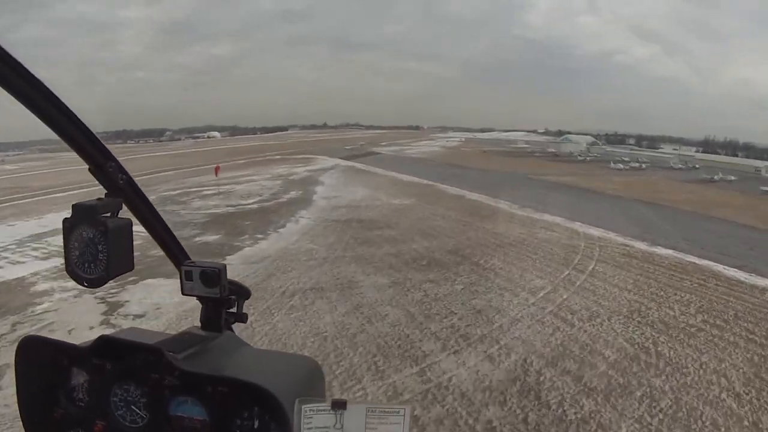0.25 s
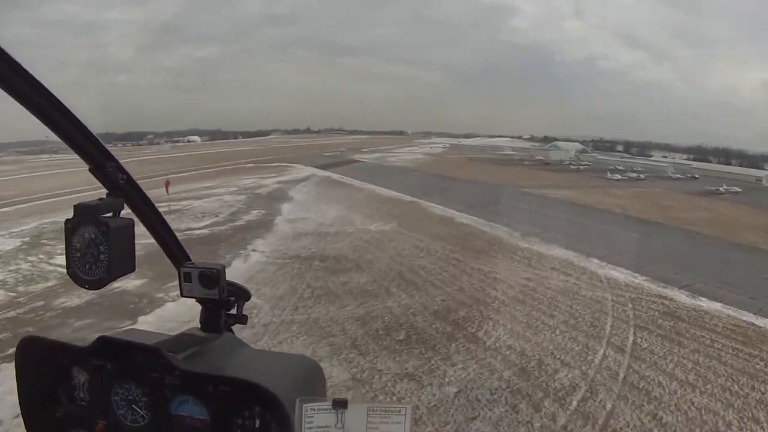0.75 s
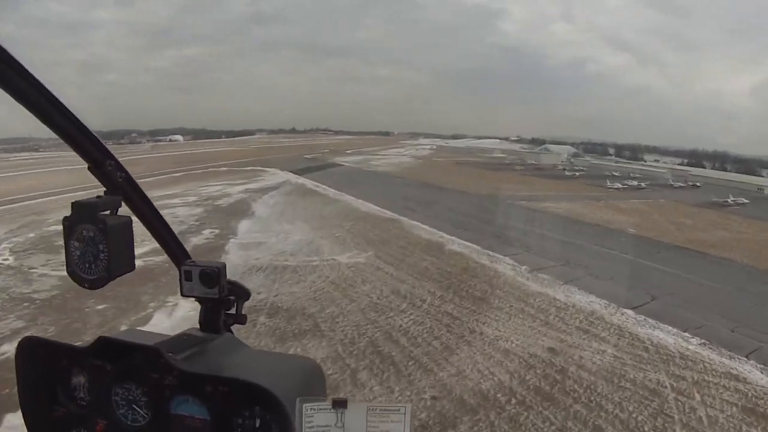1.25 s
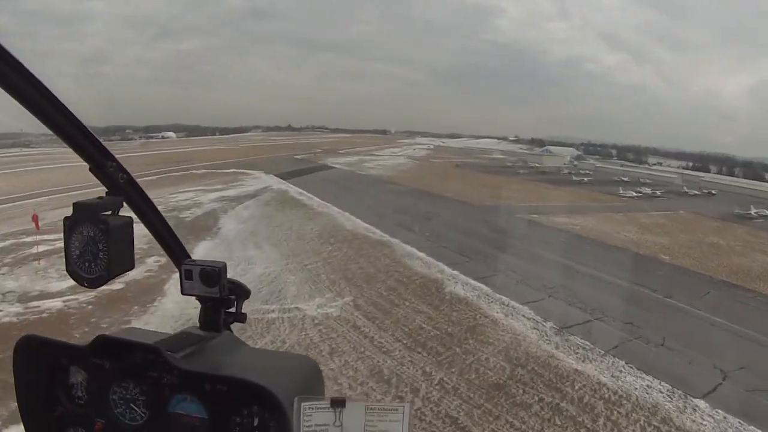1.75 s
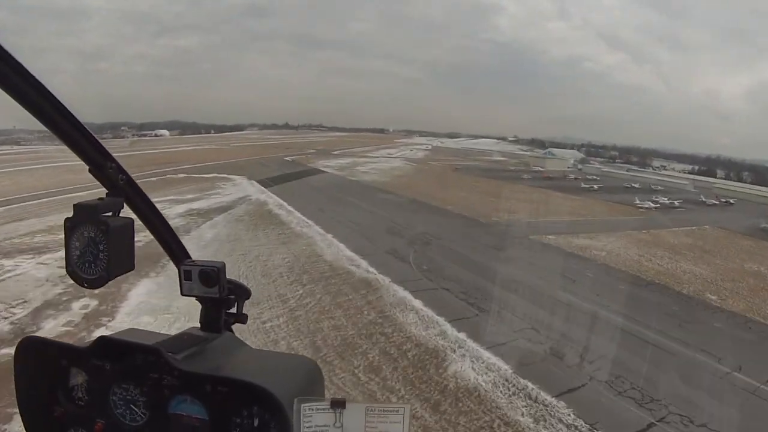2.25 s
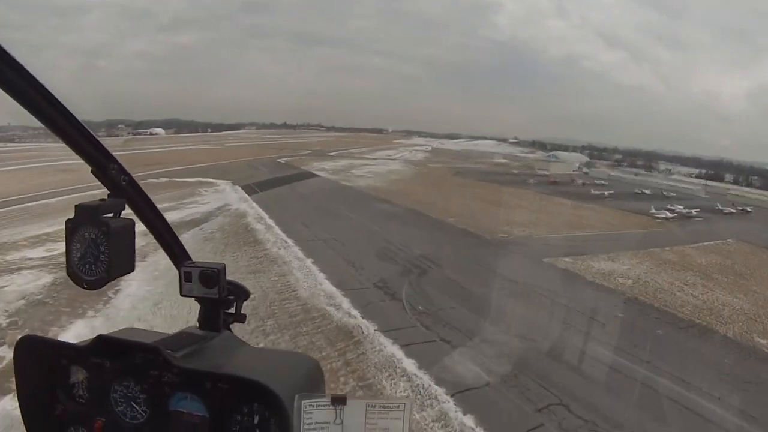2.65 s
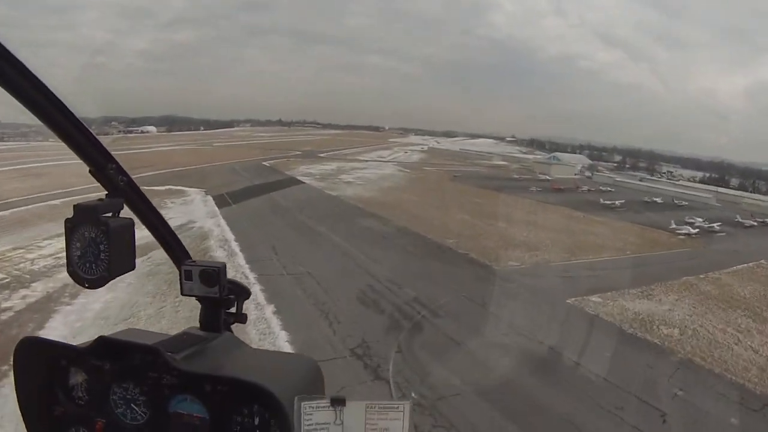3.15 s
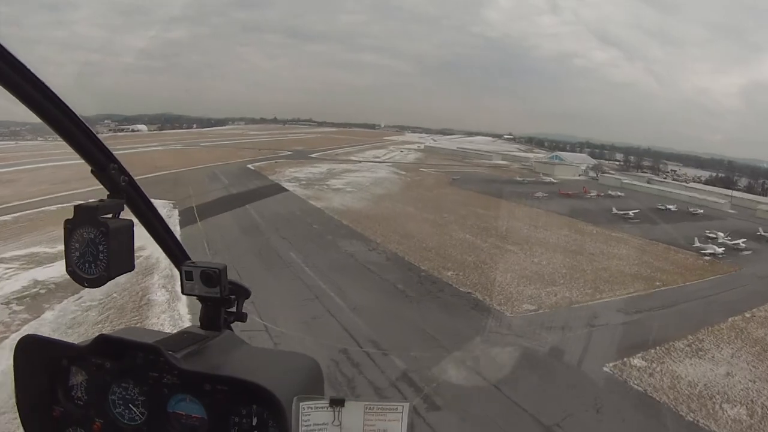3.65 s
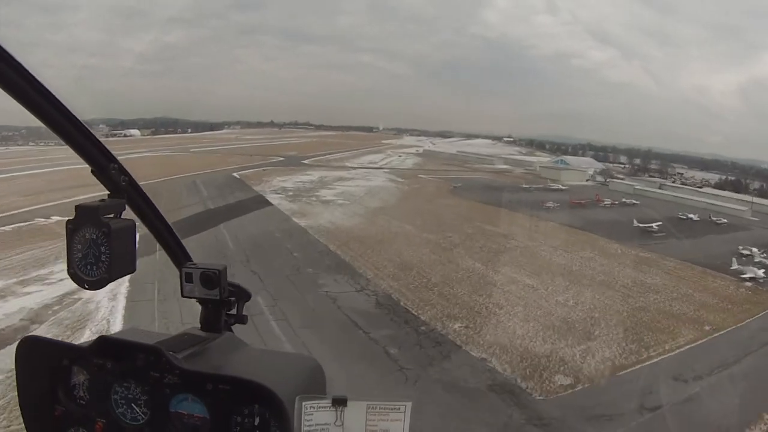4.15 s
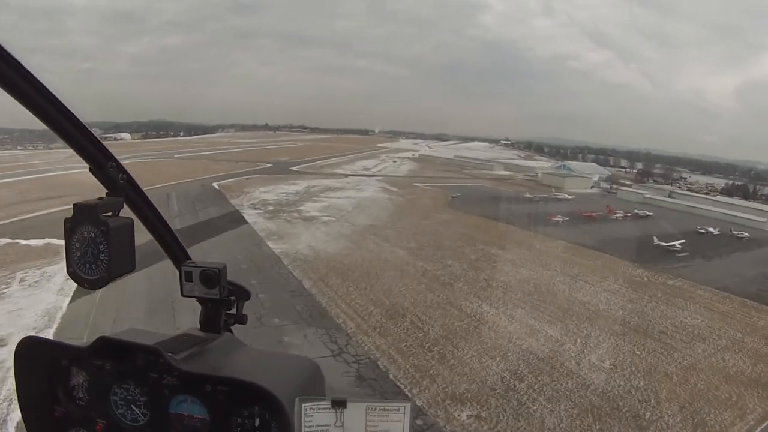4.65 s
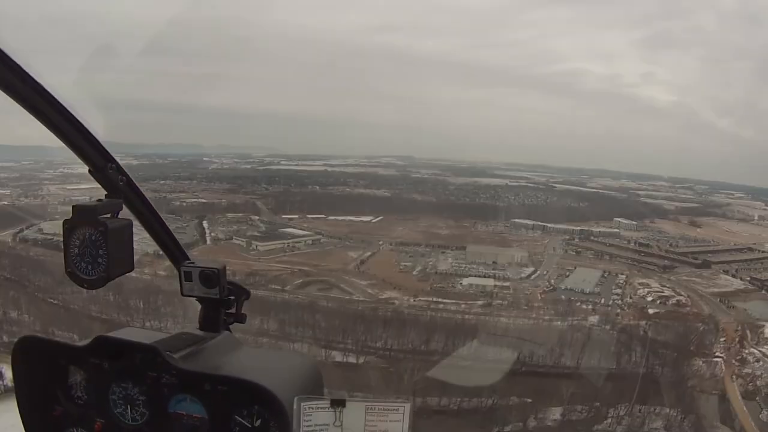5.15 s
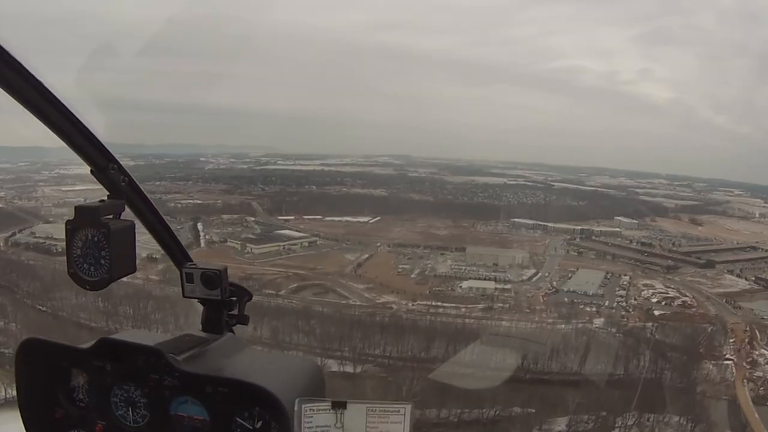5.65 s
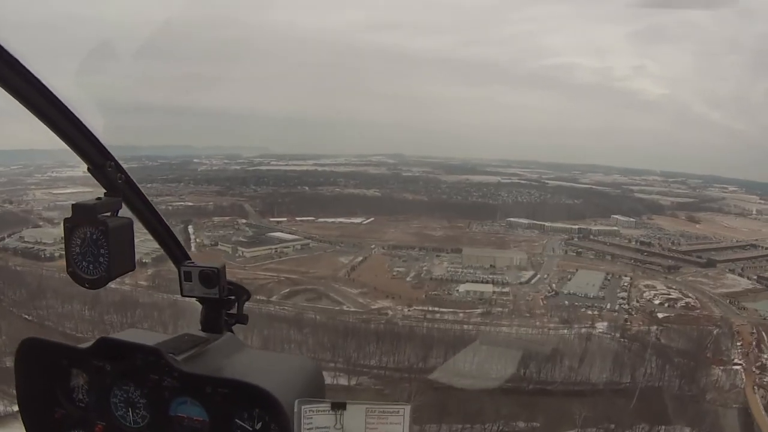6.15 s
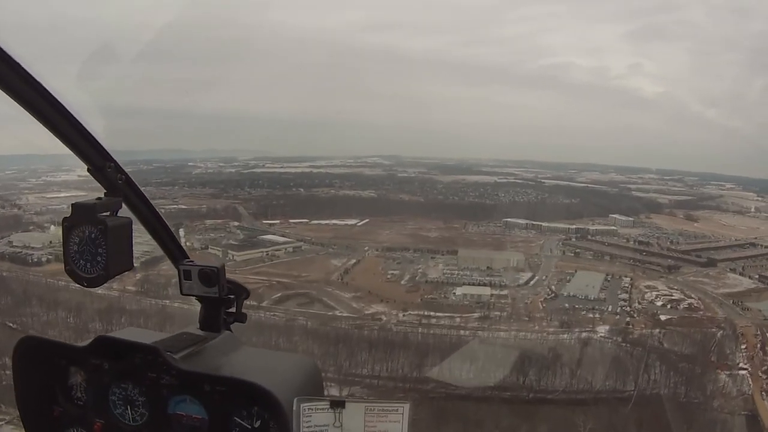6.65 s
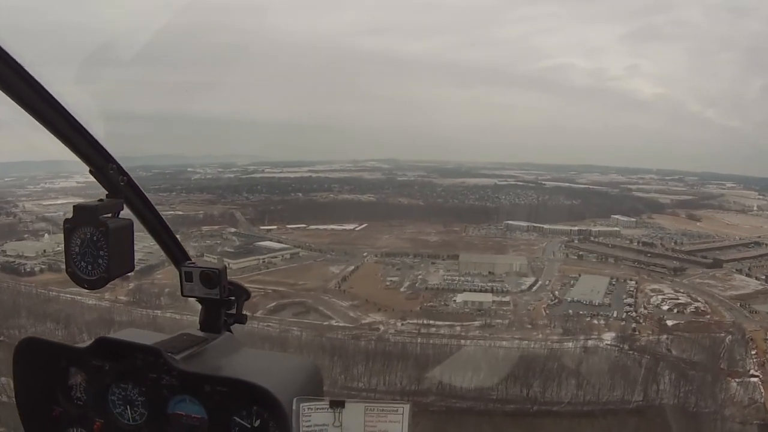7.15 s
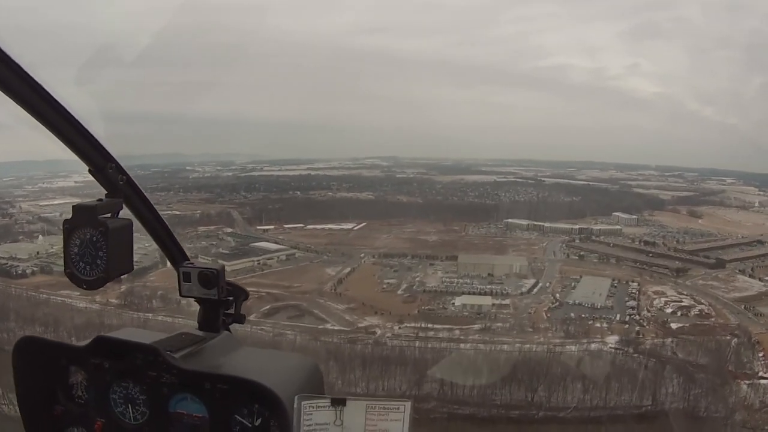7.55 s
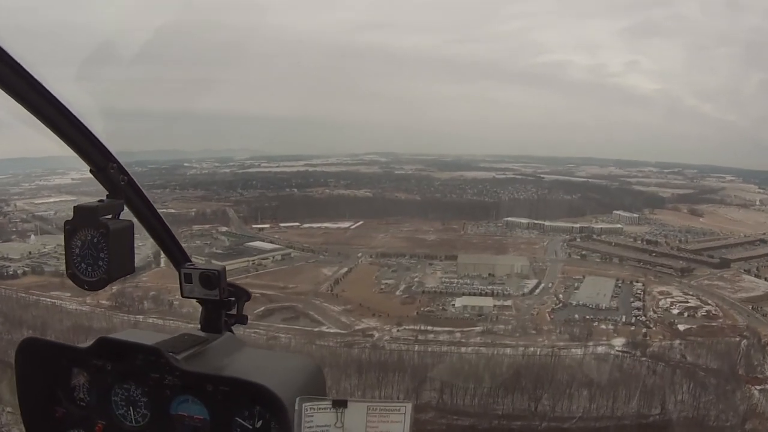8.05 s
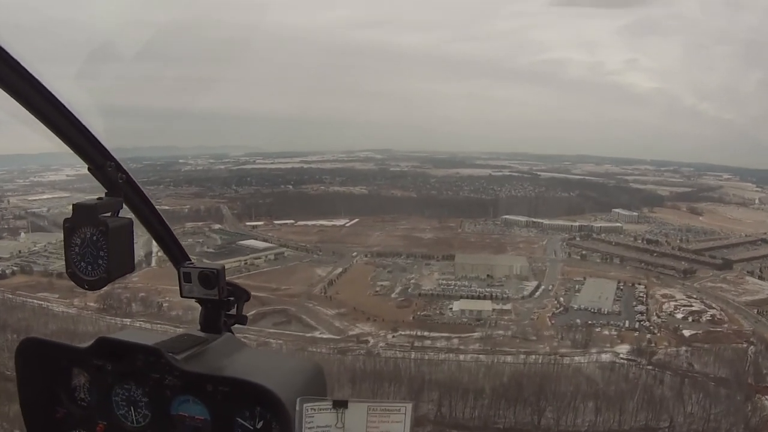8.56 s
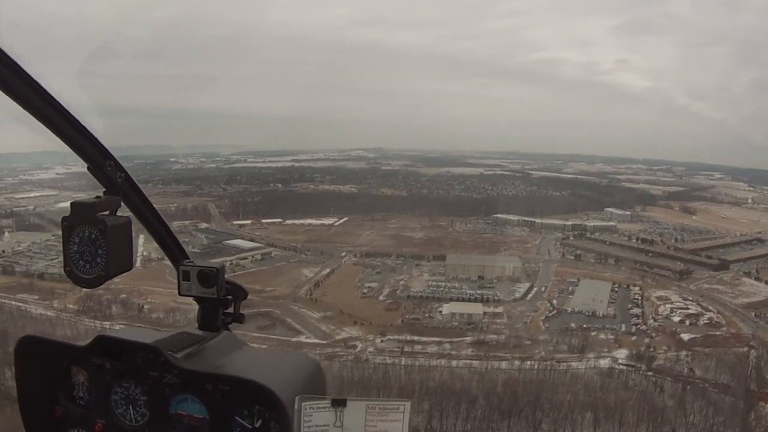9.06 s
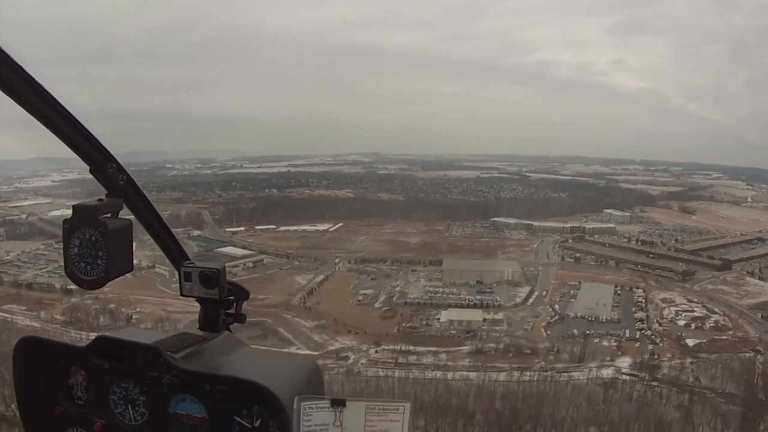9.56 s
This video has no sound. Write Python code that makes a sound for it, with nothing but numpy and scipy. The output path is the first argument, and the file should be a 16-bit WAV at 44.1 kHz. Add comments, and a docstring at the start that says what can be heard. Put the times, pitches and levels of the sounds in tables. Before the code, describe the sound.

Close cabin microphone in a light helicopter lifting off: heavy, bass-rich drone beating slowly as engine and rotor tones drift against each other, with about seventeen blade pulses a second. Dry, irregular rattling rides on top, along with muffled wind and tiny high squeaks. Halfway through, the sound clicks and jumps to climbing flight, continuing with deeper chopping and fuller panel thuds, never fading.

```python
"""Inside the cabin of a small piston helicopter: it lifts off, leaking-seal hiss growing over the first 1.4 s.
Engine harmonics throb against those of the two-blade rotor; tail rotor and gearbox add faint tones. Blade-
shaped noise makes boom, rush and hiss; struck modes make a rattle and panel thumps; chirps squeak. At 5.11 s
the scene changes to the climb with a click as the drone dips: new tone levels, deeper air chop."""
import sys
import numpy as np
from scipy import signal
from scipy.fft import rfft, irfft, next_fast_len
from scipy.io import wavfile
from scipy.ndimage import map_coordinates

SR = 44100
rng = np.random.default_rng(int(sys.argv[2]) if len(sys.argv) > 2 else 0)


def generate_wav(sig):
    """Save sig (samples, or channels by samples) to the path in sys.argv[1] as 16-bit PCM at SR."""
    pcm = np.round(np.clip(np.atleast_2d(sig).T, -1, 1) * 32767).astype(np.int16)
    wavfile.write(sys.argv[1], SR, pcm)


N = 431738
JUMP_S = 5.1113  # lift-off before, climb after


def amp(db):
    """Decibels to gain."""
    return 10 ** (np.asarray(db) / 20)


def unit(x):
    """Scales to rms 1."""
    return x / np.sqrt(np.mean(x ** 2) + 1e-20)


def curve(points):
    """Joins (s, value) points by straight lines."""
    return np.interp(np.arange(N) / SR, *np.transpose(points))


def noise(spectrum):
    """Noise of rms 1 with the given (Hz, dB) outline, interpolated over log frequency."""
    hz, db = np.transpose(spectrum)
    size = next_fast_len(N, True)
    bins_hz = np.fft.rfftfreq(size, 1 / SR)
    gain = amp(np.interp(np.log(bins_hz + 1), np.log(hz), db))
    return unit(irfft(rfft(rng.standard_normal(size)) * gain, size)[:N])


def wander(per_s):
    """Smooth random motion of rms 1, with per_s random knots a second."""
    knots = rng.standard_normal(4096)
    coarse = np.arange(0, N + 64, 64)
    motion = map_coordinates(knots, [coarse / SR * per_s], mode="wrap")
    return unit(np.interp(np.arange(N), coarse, motion))


def tones(turns, orders, climbing, smear_turns=None):
    """Complex whole harmonics of a shaft: phases lag by squared order if smeared, else scatter."""
    k, lift_db, climb_db = np.transpose(orders)
    if smear_turns is None:
        phases = rng.random(len(k))
    else:
        phases = smear_turns * (k - k[np.argmax(lift_db)]) ** 2
    angle = np.linspace(0, 1, 4097)  # one turn
    harmonics = np.sqrt(2) * np.exp(2j * np.pi * (np.outer(angle, np.round(k)) + phases))
    lift = np.interp(turns % 1, angle, harmonics @ amp(lift_db))
    climb = np.interp(turns % 1, angle, harmonics @ amp(climb_db))
    return np.where(climbing, climb, lift)


def swish(blades, depth, sharpness, lag):
    """A gain of rms 1 that swells once per blade, lag blade passes after it."""
    return unit(1 + depth * np.exp(sharpness * (np.cos(2 * np.pi * (blades - lag)) - 1)))


def pass_times(blades, place):
    """Times (s) at which the rotor reaches the given places in blade passes; -1 if outside the scene."""
    return np.interp(place, blades, np.arange(N) / SR, left=-1, right=-1)


def add(mix, s, sound):
    """Mixes a sound in at s seconds, if that is within the scene."""
    if s >= 0:
        part = mix[round(s * SR):][:len(sound)]
        part += sound[:len(part)]


# governed engine speed, almost steady: (time [s], speed [four-stroke cycles/s])
ENGINE_SPEED = [(0, 21.87), (0.9, 21.89), (2.6, 21.83), (4.3, 21.79), (5.11, 21.81), (5.9, 21.93),
                (6.7, 22.0), (7.5, 22.02), (8.2, 22.0), (9.0, 21.93)]


def engine_cycles():
    """Running count of four-stroke cycles: the integral of engine speed."""
    return np.cumsum(curve(ENGINE_SPEED)) / SR


# blade passes per engine cycle; the drive belts slip a little more at lift-off
GEARING_LIFT, GEARING_CLIMB = 0.7933, 0.7956
FIRST_PASS = 0.305  # blade passes still to go at the start


def blade_passes(cycles, climbing):
    """Rotor position geared to the engine; a blade passes at each whole number."""
    return np.where(climbing, GEARING_CLIMB, GEARING_LIFT) * cycles - FIRST_PASS


# engine harmonics: (multiple of engine cycle, sounded at nearest whole [1],
#   lift-off level re ENGINE_LEVEL [dB], climb level re ENGINE_LEVEL [dB])
ENGINE_ORDERS = [(1.01, -6.5, -10), (2.04, -10.5, -10), (3.005, 1, -0.3), (3.986, -6.5, -4),
                 (5, -13.5, -23.5), (5.998, -14.5, -19.5), (6.972, -22, -24.5), (7.987, -28, -25.5),
                 (8.98, -34, -33), (9.994, -30.5, -33), (11, -36, -37), (12, -21.5, -31), (13, -23.5, -30),
                 (13.92, -20.5, -22.5), (14.94, -27, -29.5), (16.14, -40, -30), (17, -32.5, -39.5),
                 (17.97, -37.5, -36), (19, -30, -40), (20, -42, -35.5), (22.1, -36, -37.5),
                 (26.82, -40, -38.5), (34, -53, -56), (36.1, -40, -42.5), (41, -35, -36.5),
                 (44.33, -36, -35), (47, -53, -35.5), (48.6, -48.5, -40.5), (51, -36.5, -48.5)]
# base level of the engine orders: (time [s], level [dB])
ENGINE_LEVEL = [(0, -21.8), (1.1, -21.3), (2.0, -20.1), (3.0, -21.7), (4.3, -21.7), (5.05, -20),
                (5.15, -23), (5.85, -21), (6.9, -21.8), (8.3, -20.7), (9.3, -22.3)]
# rocking of the engine tones by the rotor: (multiple of one rotor turn [1], depth [1])
ROCKING = [(1, 0.11), (2, 0.12), (3, 0.06), (4, 0.05)]
CABIN_SMEAR_TURNS = 0.28  # phase lag per squared order away from the strongest: the cabin smears each pulse


def engine(cycles, blades, climbing):
    """Firing harmonics; rotor turns and blades rock level and phase, adding lines just above each."""
    rocking = 1 + sum(depth * np.exp(1j * np.pi * k * blades) for k, depth in ROCKING)
    unsteady = cycles + 0.001 * wander(18)
    pulses = tones(unsteady, ENGINE_ORDERS, climbing, CABIN_SMEAR_TURNS)
    return (amp(curve(ENGINE_LEVEL)) * rocking * pulses).real


# rotor's fourth blade harmonic, which the cabin air favours: (time [s], level [dB])
THROB_LEVEL = [(0, -23.5), (0.5, -24), (0.87, -36), (1.27, -22.3), (2.15, -30), (2.55, -25.5), (3.1, -26.5),
               (3.55, -34.5), (4.0, -25.5), (4.5, -26), (5.05, -32), (5.2, -22.5), (5.8, -21.7),
               (6.4, -28.3), (7.55, -22.3), (8.5, -27.5), (9.4, -23.5)]
# rotor harmonics: (multiple of one rotor turn = two blade passes [1], lift-off level [dB], climb level [dB])
ROTOR_ORDERS = [(2, -35, -42), (3, -46, -44), (4, -49, -49), (7, -39, -48), (9, -38, -48.5), (10, -44, -47),
                (12, -39, -37.5), (14, -41, -37), (16, -45, -49.5), (17, -45, -52), (18, -51, -50.5),
                (19, -57, -53)]


def rotor(blades, climbing):
    """Blade harmonics; the fourth beats about four times a second against the engine's third."""
    throb = np.sqrt(2) * amp(curve(THROB_LEVEL)) * np.exp(2j * np.pi * 4 * blades)
    harmonics = tones(blades / 2 + 0.0012 * wander(4.9), ROTOR_ORDERS, climbing)
    return (throb + harmonics).real


# tail rotor harmonics: (multiple of tail blade rate [1], lift-off level [dB], climb level [dB])
TAIL_ORDERS = [(1, -35.5, -33.5), (2, -46, -43), (3, -54, -44.5), (4, -54.5, -60.5)]
TAIL_PER_CYCLE = 5.085  # tail blade passes per engine cycle


def tail_rotor(cycles, climbing):
    """Faint tail blade harmonics geared to the engine, unsteady in phase."""
    return tones(TAIL_PER_CYCLE * cycles + 0.031 * wander(9.5), TAIL_ORDERS, climbing).real


# gear whines: (multiple of engine cycle [1], level [dB])
WHINES = [(154.3, -64), (463, -90)]


def gearbox(cycles):
    """Thin wavering whines locked to the engine."""
    out = np.zeros(N)
    for k, db in WHINES:
        turns = k * cycles + 0.00041 * k * wander(35)
        out += np.sqrt(2) * amp(db) * np.cos(2 * np.pi * turns)
    return out


# cabin boom outline: (frequency [Hz], relative density [dB/Hz])
BOOM = [(15, -38.5), (30, -23), (45, -9.5), (70, -2), (138, -3.5), (170, -10.5), (205, -10.5), (250, -11.5),
        (268, -4), (328, -4), (348, -10), (420, -14), (500, -24.5), (560, -23), (900, -72)]
BOOM_LIFT_DB, BOOM_CLIMB_DB = -31, -30.5


def boom(blades, climbing):
    """Cabin boom: turbulence plus a wavering growl repeating each rotor turn, swelling with each blade."""
    growl_share = 0.4
    k = np.arange(13, 60)
    turn_hz = (blades[-1] - blades[0]) / 2 * SR / N
    db = np.interp(k * turn_hz, *np.transpose(BOOM))
    growl = tones(blades / 2 + 0.0013 * wander(7), np.c_[k, db, db], climbing).real
    turbulence = np.sqrt(1 - growl_share) * noise(BOOM)
    buffet = unit(turbulence + np.sqrt(growl_share / 2) * unit(growl))
    chop = swish(blades, depth=np.where(climbing, .5, .2), sharpness=1.1, lag=0.18)
    return amp(np.where(climbing, BOOM_CLIMB_DB, BOOM_LIFT_DB)) * buffet * chop


# canopy rush outline: (frequency [Hz], relative density [dB/Hz])
RUSH = [(300, -31), (530, -11), (630, 3.5), (705, -3.5), (900, -4.5), (990, -0.5), (1120, -9.5),
        (1270, -2.5), (1520, -2), (1900, -4), (2220, -11), (2420, -13), (2650, -20.5), (3400, -18.5),
        (4200, -59.5)]


def rush(blades):
    """Air rushing over the canopy, chopped by the blades, its level fluttering."""
    chop = swish(blades, depth=0.31, sharpness=0.52, lag=0.099)
    return amp(-40) * noise(RUSH) * chop * amp(1.53 * wander(70))


# air hiss outline: (frequency [Hz], relative density [dB/Hz])
HISS = [(1500, -5), (2900, 6.5), (3350, 0), (3520, -2.5), (3680, 4.5), (3900, 2), (5200, 0.5), (6500, -4.5),
        (8500, -16), (10500, -18), (12000, -29), (13500, -39.5)]


def hiss(blades, climbing):
    """Air hiss in sharp blade pulses, its level fluttering."""
    chop = swish(blades, depth=np.where(climbing, .25, .2), sharpness=6.5, lag=0.078)
    return amp(-53.5) * noise(HISS) * chop * amp(.7 * wander(45))


# leaking seal outline: (frequency [Hz], relative density [dB/Hz])
LEAK = [(4000, -10), (5400, -9), (5950, 1.5), (6400, 0), (7100, -2.5), (7800, -8), (8500, -14.5),
        (9700, -21), (11500, -37.5), (13500, -50.5)]
LEAK_HOVER_DB, LEAK_FLIGHT_DB, LEAK_RISE_S = -69, -62.5, 1.4


def leaking_seal(blades, climbing):
    """Seal hiss grows as the helicopter gathers speed; forward speed deepens the blade chop."""
    chop = swish(blades, depth=np.where(climbing, 2.2, .7), sharpness=2.5, lag=0.73)
    level_db = curve([(0, LEAK_HOVER_DB), (LEAK_RISE_S, LEAK_FLIGHT_DB)]) + 0.72 * wander(25)
    return amp(level_db) * noise(LEAK) * chop


# clear knocks of the loose fitting: (time [s], strength before the rattle's gain [dB])
KNOCKS = [(0.0346, -21.5), (0.0615, -17), (0.124, -27), (0.187, -21), (0.233, -22.5), (0.2908, -23),
          (0.3296, -24.5), (0.4154, -24), (0.4704, -22), (0.4922, -24), (0.5125, -21.5), (0.5444, -23),
          (0.5754, -25.2), (0.5918, -20), (0.6436, -22.5), (0.6994, -17.5), (0.741, -25.5), (0.7602, -27),
          (0.805, -23), (0.8813, -26), (0.93, -21.5), (0.996, -23), (1.052, -23.5), (1.2362, -25.5),
          (1.2633, -28), (1.2847, -17), (1.3413, -26.5), (1.4758, -26), (1.5144, -22.5), (1.695, -21.5),
          (1.751, -19.5), (1.792, -26), (1.816, -22.5), (1.8388, -25), (1.8638, -20.5), (1.9241, -19.0),
          (1.979, -26.5), (2.027, -25), (2.0666, -21), (2.1522, -16), (2.2088, -23.5), (2.266, -21),
          (2.319, -26.5), (2.3823, -18.3), (2.437, -20.5), (2.502, -26), (2.559, -28), (2.6099, -17),
          (2.658, -21), (2.7255, -21), (2.8095, -29), (2.841, -23.5), (2.8959, -18), (3.0141, -22.5),
          (3.0708, -25), (3.1253, -19.5), (3.167, -25), (3.192, -22), (3.207, -24.5), (3.2492, -24.5),
          (3.3069, -25), (3.355, -16), (3.4507, -23), (3.4873, -27), (3.506, -29), (3.5378, -18),
          (3.652, -21), (3.7093, -20.5), (3.769, -20), (3.8206, -21), (3.8932, -26.5), (3.939, -19),
          (3.9986, -25), (4.0548, -23.5), (4.123, -19.5), (4.169, -19), (4.2276, -25.5), (4.3503, -24),
          (4.3976, -19), (4.5188, -20.5), (4.548, -24.5), (4.581, -19.5), (4.6304, -31), (4.6949, -25.5),
          (4.7497, -20.5), (4.792, -29), (4.8098, -20.5), (4.9332, -24), (4.9814, -21.5), (5.0199, -24),
          (5.042, -20), (5.0973, -17.5), (5.144, -20.5), (5.1988, -19.5), (5.2605, -17), (5.314, -22),
          (5.4288, -18.5), (5.5447, -25), (5.608, -21), (5.659, -20), (5.722, -23), (5.7747, -23.3),
          (5.8373, -21.5), (5.8733, -26), (5.8879, -20.5), (5.91, -25), (5.95, -20), (6.003, -27),
          (6.039, -25), (6.0662, -22), (6.123, -22), (6.1782, -22.0), (6.2352, -25), (6.2698, -21.5),
          (6.2932, -21.4), (6.344, -18.5), (6.4072, -23.5), (6.4633, -23), (6.5216, -15), (6.544, -26),
          (6.5798, -20), (6.6933, -24), (6.751, -22), (6.808, -17.5), (6.8675, -27), (6.9191, -17),
          (6.9793, -24.5), (7.0344, -18), (7.091, -21), (7.1468, -17), (7.206, -17.5), (7.2629, -19),
          (7.3764, -25), (7.441, -22.5), (7.4907, -19), (7.602, -21), (7.6682, -20), (7.7182, -18.5),
          (7.7762, -23.5), (7.8293, -22.4), (7.86, -25), (7.8962, -20.5), (7.945, -24), (8.002, -24.5),
          (8.0563, -19), (8.123, -23.5), (8.1721, -20.5), (8.2841, -22.5), (8.3262, -22.5), (8.3517, -20),
          (8.3992, -18.5), (8.457, -22.5), (8.5198, -18.5), (8.5781, -24), (8.6274, -21.7), (8.6919, -19.5),
          (8.7469, -19), (8.808, -19.6), (8.9203, -18.5), (8.976, -20.5), (9.0363, -16.5), (9.09, -24),
          (9.1573, -23.5), (9.2054, -19.5), (9.266, -18.5), (9.3204, -24), (9.3813, -25.5), (9.4335, -17.5),
          (9.4953, -22.4), (9.5498, -21), (9.576, -32), (9.6639, -17), (9.724, -24.5)]
KNOCK_LAG_PASSES, KNOCK_JITTER_PASSES = 0.05, 0.032
LIGHT_DB, STRAY_DB, KNOCK_SPREAD_DB = -31.5, -30.5, 2.5  # before the rattle's gain
STRAYS_LIFT, STRAYS_CLIMB = 0.65, 0.36  # share of the gaps between blades that get a stray


def knocks(blades, climbing):
    """Times and strengths: clear knocks, a light one per remaining blade, faint strays in between."""
    t = np.arange(N) / SR
    passes = np.arange(int(blades[-1]) + 1)
    late, force, stray_force = np.clip(rng.standard_normal((len(passes), 3)), -2, 2).T
    place, chance = rng.random((len(passes), 2)).T
    clear_s, clear_db = np.transpose(KNOCKS)
    light_s = np.interp(passes + KNOCK_LAG_PASSES + KNOCK_JITTER_PASSES * late, blades, t)
    free = ~np.isin(passes, np.round(np.interp(clear_s, t, blades)))  # a clear knock takes its blade's turn
    light = free * amp(LIGHT_DB + KNOCK_SPREAD_DB * force)
    stray_s = np.interp(passes + KNOCK_LAG_PASSES + 0.25 + 0.5 * place, blades, t)
    stray_share = np.where(np.interp(stray_s, t, climbing) > .5, STRAYS_CLIMB, STRAYS_LIFT)
    stray = (chance < stray_share) * amp(STRAY_DB + KNOCK_SPREAD_DB * stray_force)
    return np.r_[clear_s, light_s, stray_s], np.r_[amp(clear_db), light, stray]


def burst(t, band_hz, fall_s, order):
    """A crowd of short-lived modes in one band, rms 1: decaying noise, band-passed."""
    kick = rng.standard_normal(len(t)) * np.exp(-t / fall_s)
    return unit(signal.sosfilt(signal.butter(order, band_hz, "bandpass", fs=SR, output="sos"), kick))


# fitting modes: (centre frequency [Hz], relative level [dB], t60 [s])
FITTING = [(630, -13, 0.045), (950, -11, 0.012), (1341, -11.5, 0.024), (1543, 5.5, 0.024), (1677, 0, 0.026),
           (1937, -12.5, 0.024), (2404, -0.5, 0.031), (2920, -14, 0.05), (3200, -3.5, 0.0046)]
CLACK_HZ, TICK_HZ = (1247, 2416), (2880, 3780)
CLACK_S, TICK_S = 0.003, 0.0025  # decay
CLACK_DB, TICK_DB = -7.5, -25  # re the modes


def ring(contact_s, soft_hz, spread_db, detune=.018):
    """One blow of energy 1: modes weighted and shifted by how it sits, a dense clack, a bright tick."""
    t = np.arange(2048) / SR
    weights, shifts = rng.uniform(-1, 1, (2, len(FITTING)))
    modes = np.zeros(len(t))
    for (hz, db, t60_s), weight, shift in zip(FITTING, weights, shifts):
        decay = np.exp(-np.log(1000) * t / t60_s)
        modes += amp(db + spread_db * weight) * decay * np.sin(2 * np.pi * hz * (1 + detune * shift) * t)
    dull = signal.sosfilt(signal.butter(5, soft_hz, fs=SR, output="sos"), modes)
    clack = amp(CLACK_DB) * burst(t, CLACK_HZ, CLACK_S, order=6)
    tick = amp(TICK_DB) * burst(t, TICK_HZ, TICK_S, order=3)
    blow = unit(dull) + clack + tick
    blow *= 1 - np.exp(-(t / contact_s) ** 2)  # the contact takes a moment to build
    return blow / np.linalg.norm(blow)


KNOCK_GAIN_DB = 16
CHATTER_DB, CHATTER_SPREAD_DB, CHATTER_PER_S = -21.5, 1.5, 150
BOUNCE, BOUNCE_S = 0.33, 0.0044  # mean size re the knock, mean delay
SKITTER, SKITTER_S = 0.18, 0.012
SPOTS = 16


def rattle(cycles, s, force):
    """The fitting knocks, bounces once, skitters to rest, and chatters lightly with each crank turn."""
    shake = 1 + np.cos(2 * np.pi * 2 * cycles)  # two crank turns per cycle
    chatter_db = CHATTER_DB + CHATTER_SPREAD_DB * np.clip(rng.standard_normal(N), -2, 2)
    blows = (rng.random(N) < shake * CHATTER_PER_S / SR) * amp(chatter_db)
    late, strength, *touches = rng.uniform(-1, 1, size=(len(s), 6)).T
    contacts = [(s, 1), (s + BOUNCE_S * (1 + 0.13 * late), BOUNCE * (1 + .5 * strength))]
    for u in touches:  # later touches are lighter
        contacts.append((s + SKITTER_S * (1 + 0.62 * u), SKITTER * (1 - 0.7 * u)))
    for when, size in contacts:
        index = np.clip(np.round(when * SR).astype(int), 0, N - 1)
        np.add.at(blows, index, size * force * amp(KNOCK_GAIN_DB))
    spot = rng.integers(0, SPOTS, N)  # each blow lands on one of a few spots
    out = np.zeros(N)
    for k in range(SPOTS):
        sound = ring(contact_s=0.00043, soft_hz=2504, spread_db=4.5)
        out += signal.oaconvolve(blows * (spot == k), sound)[:N]
    return out


# cabin panel modes: (frequency [Hz], t60 [s], lift-off level [dB], climb level [dB]); levels before the rise
PANELS = [(136, 0.09, -36, -33), (368, 0.054, -52.5, -33), (646, 0.03, -47.5, -43.5)]


def thumps(blades, lag_passes=0.018, jitter_passes=0.0096, rise_s=0.0048, spread_db=1.5):
    """The pressure pulse of each blade sets the cabin's panels ringing briefly."""
    passes = np.arange(int(blades[-1]) + 1)
    late, *forces = np.clip(rng.standard_normal((len(passes), 1 + len(PANELS))), -2, 2).T
    times_s = pass_times(blades, passes + lag_passes + jitter_passes * late)
    t, out = np.arange(8192) / SR, np.zeros(N)
    for (hz, t60_s, lift_db, climb_db), force in zip(PANELS, forces):
        envelope = (1 - np.exp(-t / rise_s)) * np.exp(-np.log(1000) * t / t60_s)
        mode = envelope * np.sin(2 * np.pi * hz * t)
        for s, f in zip(times_s, force):
            db = climb_db if s > JUMP_S else lift_db
            add(out, s, amp(db + spread_db * f) * mode)
    return out


# squeaks of a tight joint: (place in the rotor turn [blade passes], centre frequency [Hz],
#   lift-off peak [dB], climb peak [dB])
SQUEAKS = [(0.24, 5420, -60, -73.5), (0.76, 6850, -58, -65.5), (0.81, 5500, -58, -66),
           (1.25, 6000, -56.5, -75), (1.52, 7300, -58.5, -62), (1.83, 6000, -59, -60.5)]


def squeaks(blades, width_s=0.0035, jitter_passes=0.03, detune=0.015, glide_hz_per_s=-18000, rasp=0.12,
            spread_db=3):
    """Tiny rough falling chirps, each coming back at its own place in the rotor's turn."""
    turns = np.arange(0, int(blades[-1]) + 1, 2)
    t, out = np.arange(-1024, 1024) / SR, np.zeros(N)
    envelope = np.exp(-.5 * (t / width_s) ** 2)
    for place, hz, lift_db, climb_db in SQUEAKS:
        late, shift, force = np.clip(rng.standard_normal((3, len(turns))), -2, 2)
        slips = np.cumsum(rasp * rng.standard_normal((len(turns), len(t))), axis=1)  # rough phase
        times_s = pass_times(blades, turns + place + jitter_passes * late)
        for s, u, f, slip in zip(times_s, shift, force, slips):
            pitch_hz = hz * (1 + detune * u) + glide_hz_per_s * t
            chirp = np.sin(2 * np.pi * np.cumsum(pitch_hz) / SR + slip)
            db = climb_db if s > JUMP_S else lift_db
            add(out, s + t[0], amp(db + spread_db * f) * envelope * chirp)
    return out


def click(db=-15, fall_s=0.001):
    """A single sharp step, decaying exponentially, where the drone jumps."""
    age_s = np.arange(N) / SR - JUMP_S
    return amp(db) * (age_s >= 0) * np.exp(-abs(age_s) / fall_s)


def scene():
    """All sources in the cabin, one channel; the engine drives both rotors."""
    t = np.arange(N) / SR
    climbing = t >= JUMP_S
    cycles = engine_cycles()
    blades = blade_passes(cycles, climbing)
    dip = 1 - np.exp(-abs(t - JUMP_S) / 0.0013)  # the drone drops out for an instant at the jump
    drone = dip * (engine(cycles, blades, climbing) + rotor(blades, climbing) + tail_rotor(cycles, climbing))
    air = boom(blades, climbing) + rush(blades) + hiss(blades, climbing) + leaking_seal(blades, climbing)
    cabin = rattle(cycles, *knocks(blades, climbing)) + thumps(blades) + squeaks(blades)
    return (drone + gearbox(cycles) + air + cabin + click())[None]


def record(dry):
    """Linear-phase low-pass at 14 kHz."""
    low_pass = signal.firwin(511, 14000, window=("kaiser", 9), fs=SR)
    return signal.oaconvolve(dry, low_pass[None], "same")


dry = scene()
out = record(dry)
generate_wav(out)
```